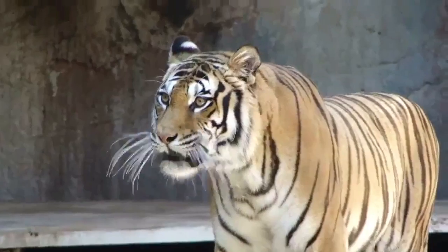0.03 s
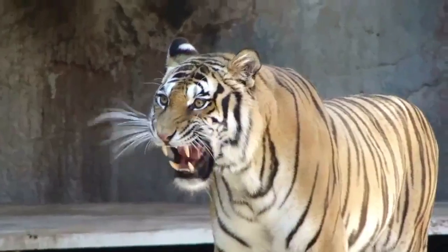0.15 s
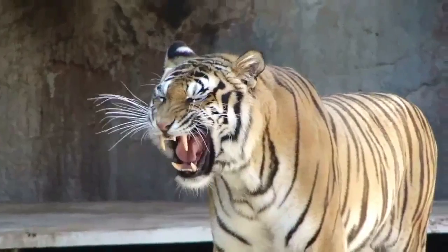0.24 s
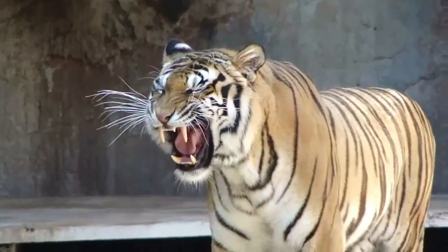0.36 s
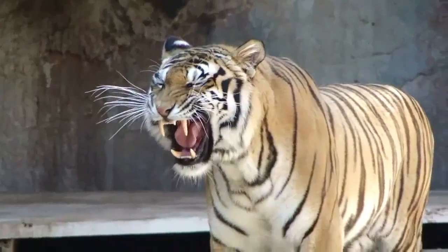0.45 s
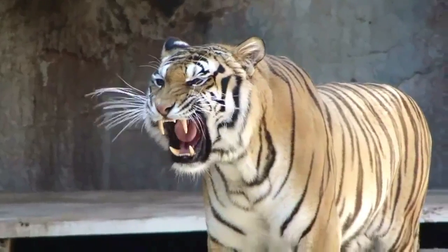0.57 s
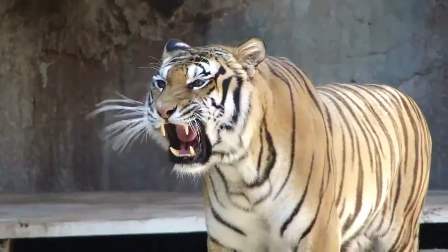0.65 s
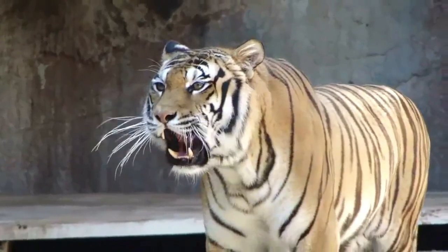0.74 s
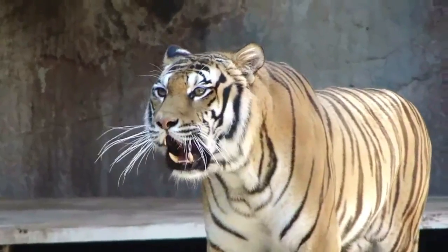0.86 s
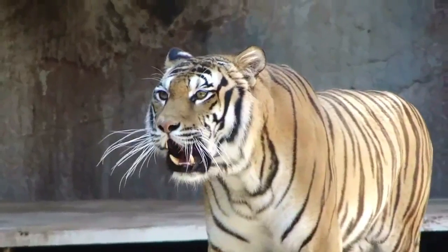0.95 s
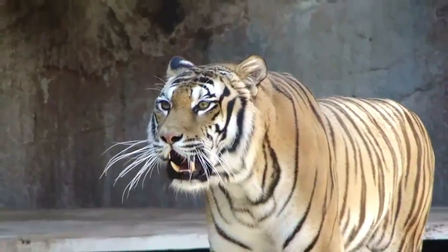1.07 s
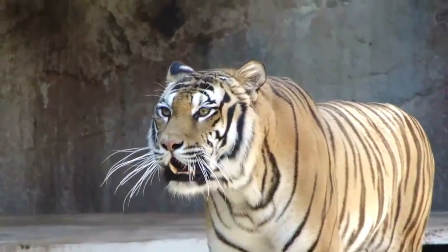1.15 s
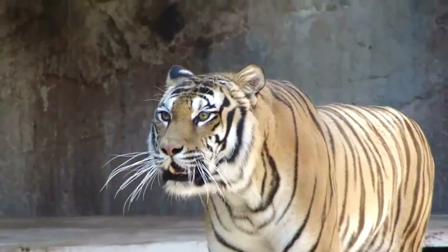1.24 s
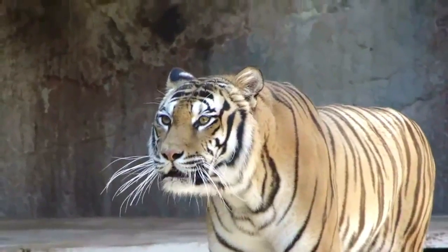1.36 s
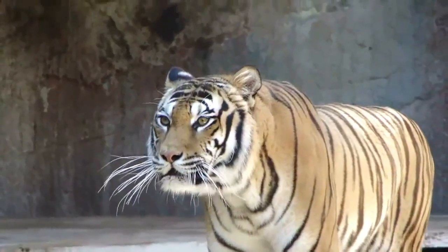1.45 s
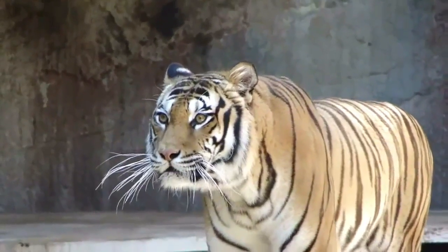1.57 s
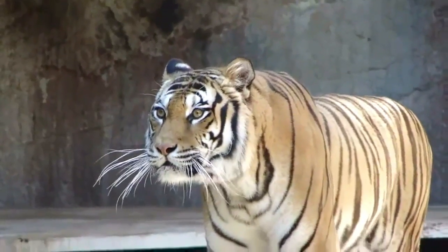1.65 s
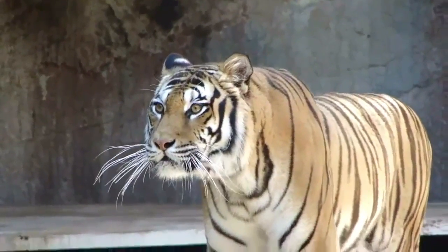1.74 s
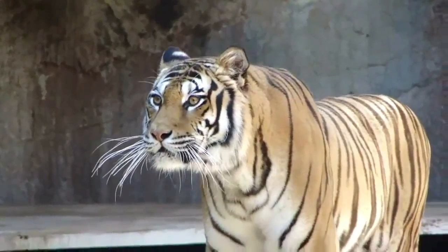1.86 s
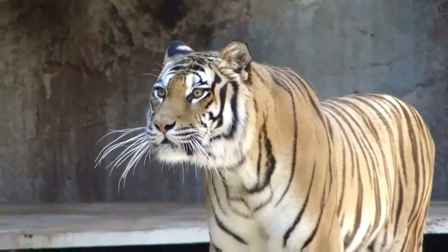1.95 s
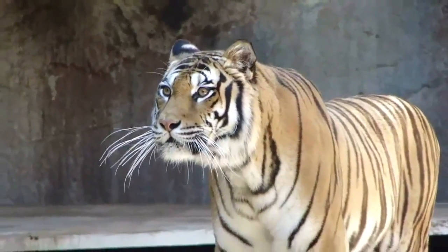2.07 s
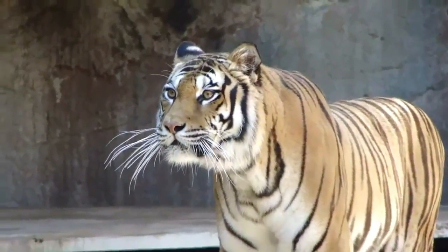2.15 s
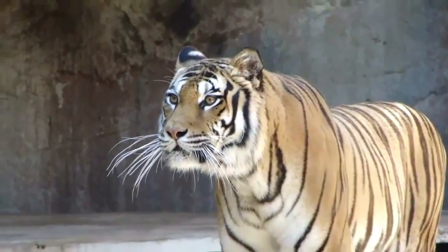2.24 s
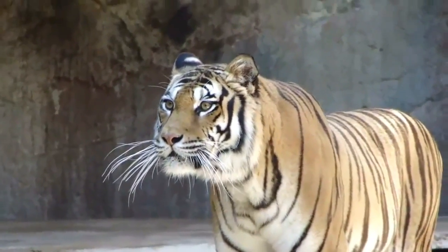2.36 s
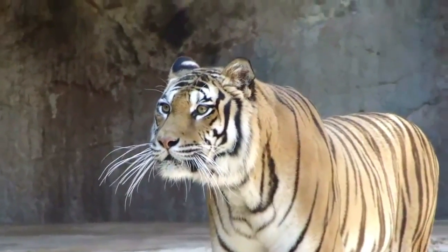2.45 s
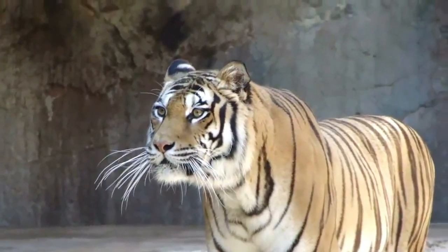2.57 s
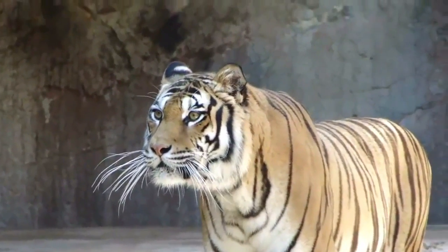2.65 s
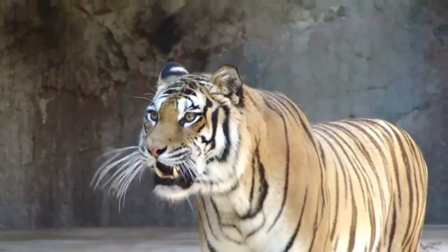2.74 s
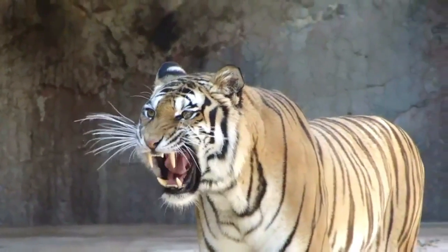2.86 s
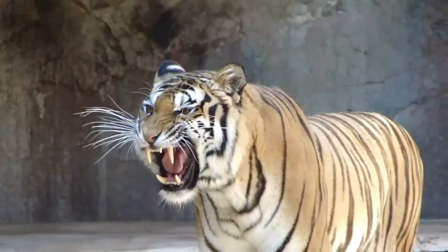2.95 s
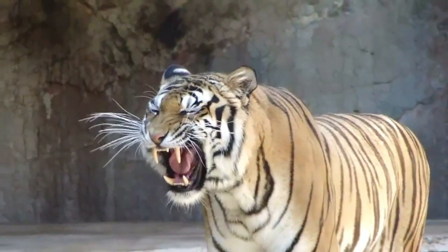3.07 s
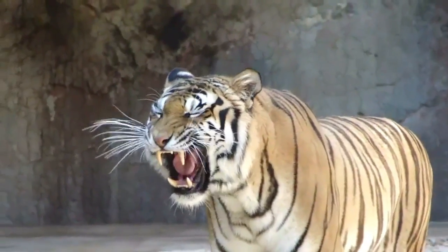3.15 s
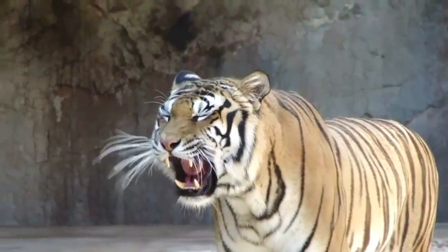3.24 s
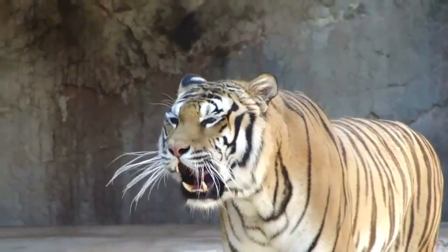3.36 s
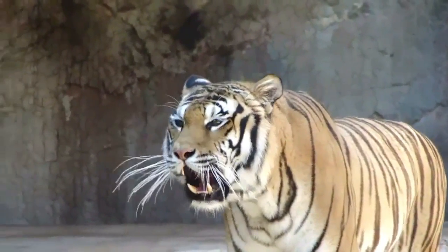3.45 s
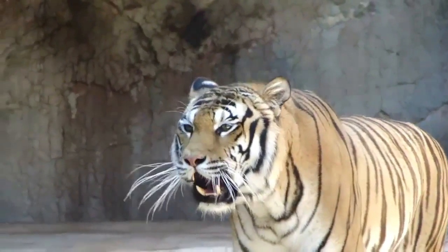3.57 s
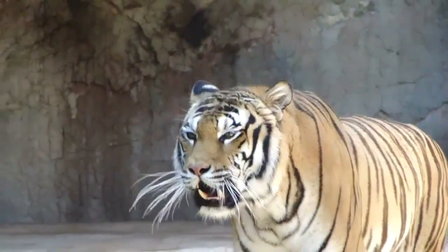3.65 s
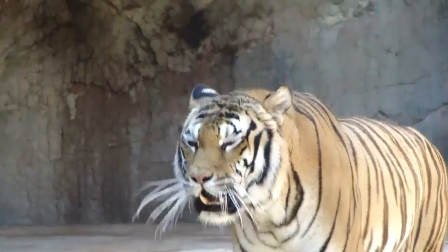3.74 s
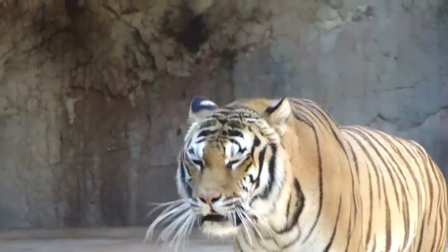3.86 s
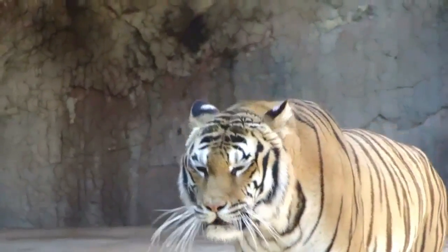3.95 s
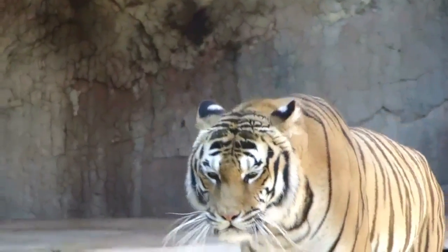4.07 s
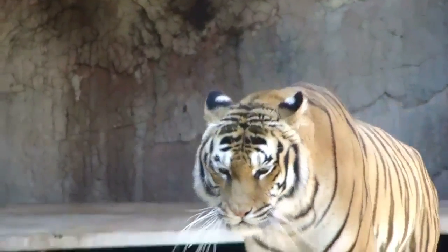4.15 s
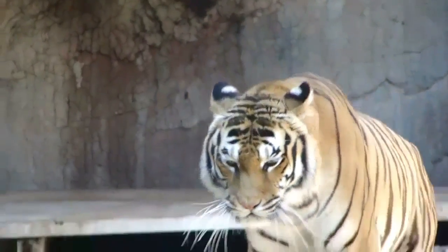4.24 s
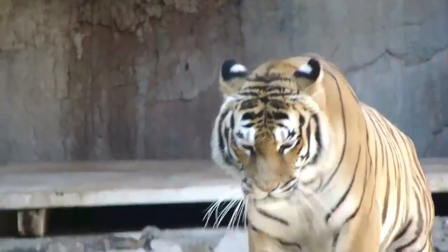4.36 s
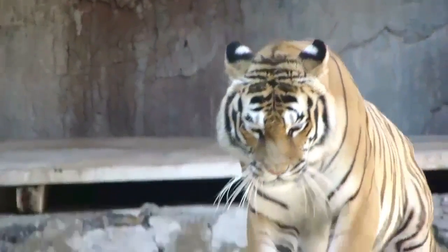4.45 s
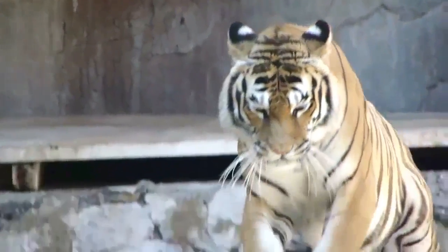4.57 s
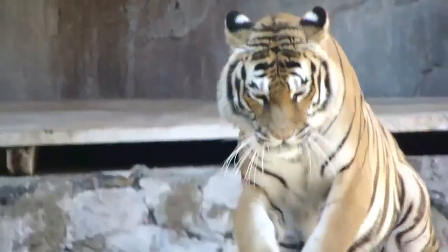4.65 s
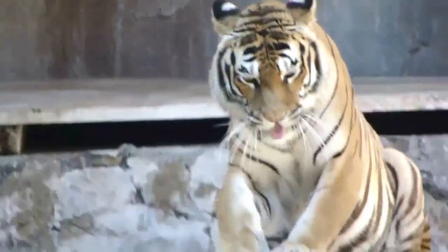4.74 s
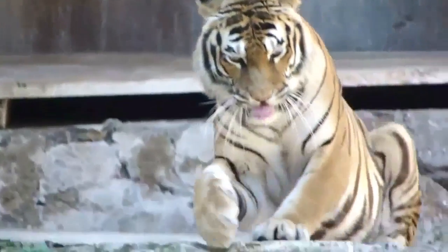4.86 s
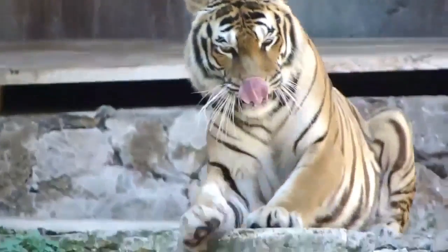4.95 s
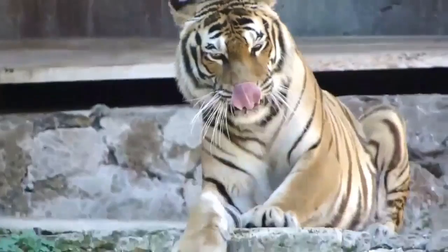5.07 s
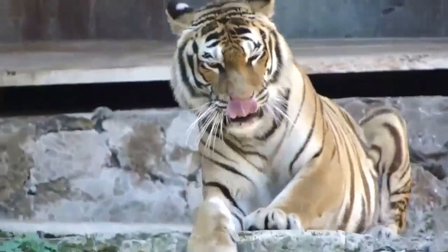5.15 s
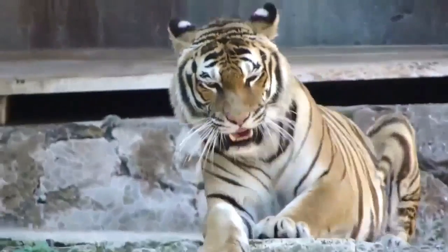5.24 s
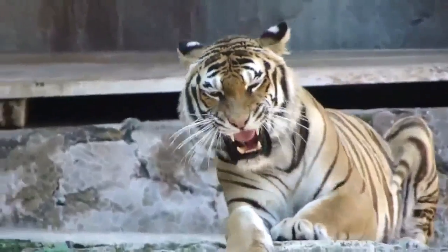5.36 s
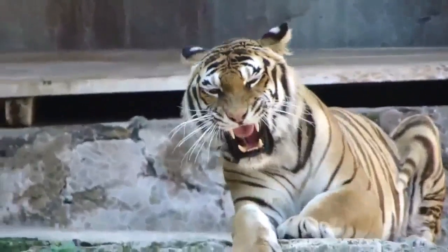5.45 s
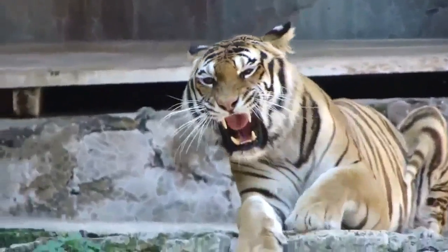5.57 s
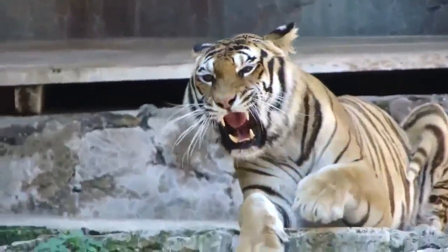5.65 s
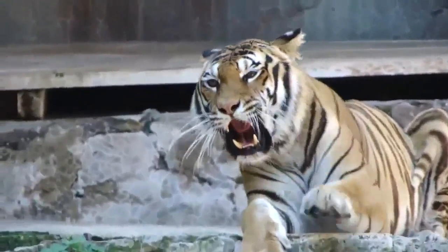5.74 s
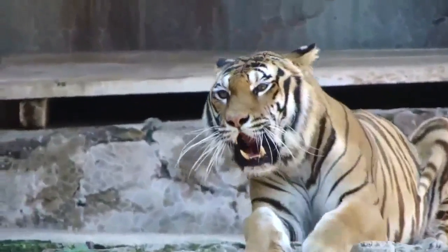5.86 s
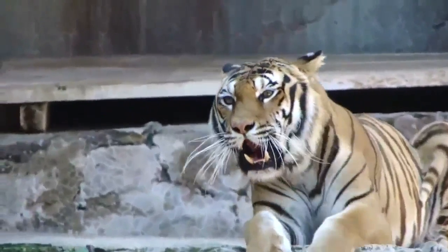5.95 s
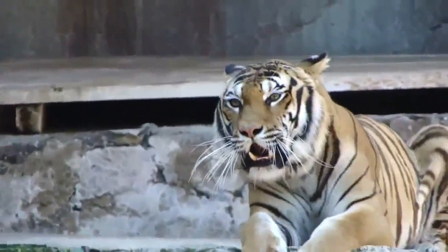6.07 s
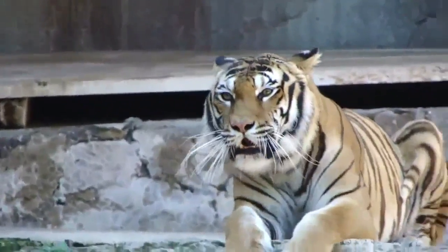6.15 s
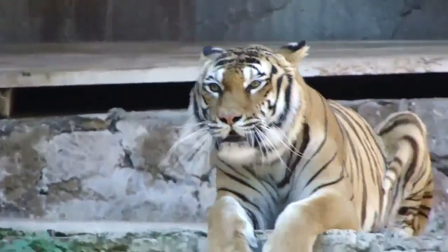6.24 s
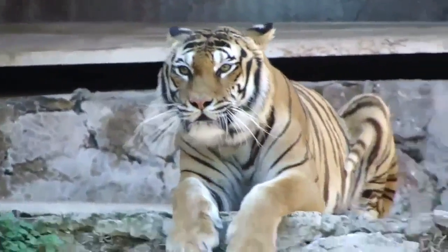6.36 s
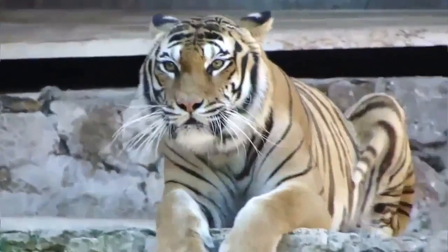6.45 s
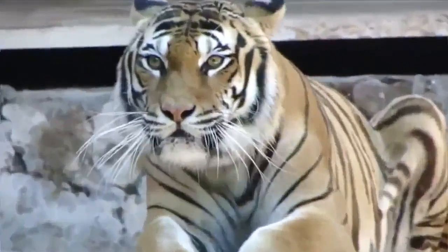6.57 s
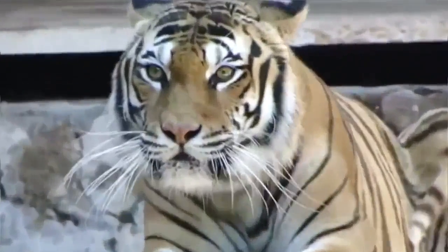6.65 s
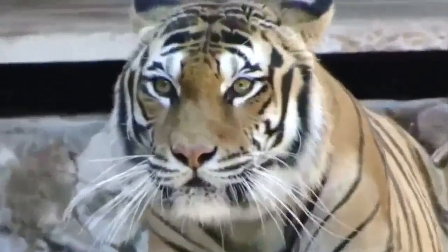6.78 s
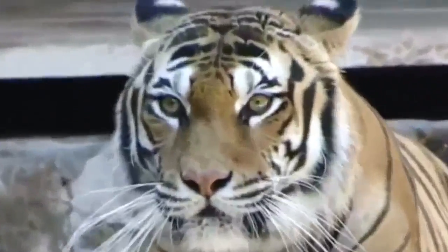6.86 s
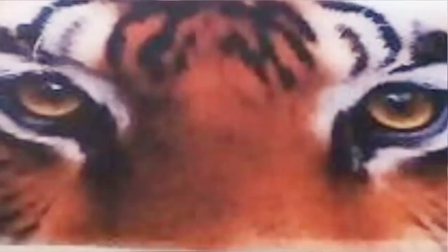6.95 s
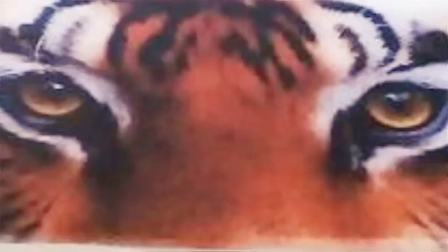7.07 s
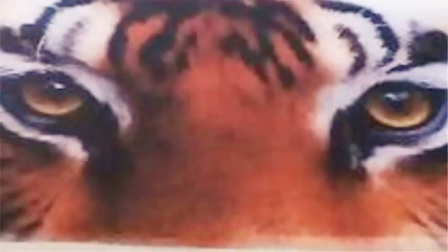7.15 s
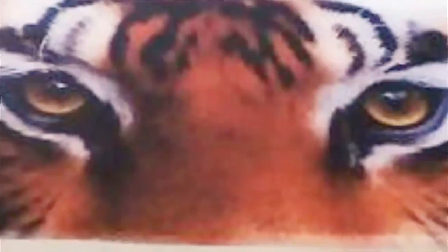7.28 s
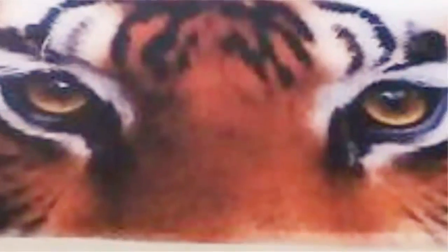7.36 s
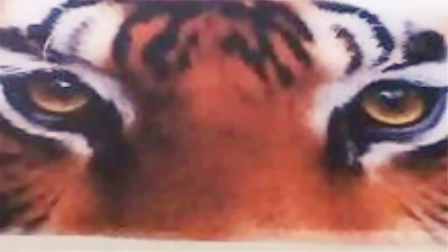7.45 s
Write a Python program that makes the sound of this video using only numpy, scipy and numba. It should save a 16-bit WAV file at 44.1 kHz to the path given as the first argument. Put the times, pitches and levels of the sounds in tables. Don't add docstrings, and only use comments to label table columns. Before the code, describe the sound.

A tiger very close to the microphone in a quiet enclosure. A short snort bursts into a loud, hoarse roar, sags into a low fluttering growl, and a second growl begins to rise. An identical call cuts in over it and runs further: the last growl swells to a snarl, rattles down and fades. After a tiny silent gap, another snort starts. Faint hiss and low murmur lie beneath.

```python
import sys
import numpy as np
from scipy import signal
from scipy.io import wavfile
from scipy.ndimage import uniform_filter1d
from numba import njit

SR = 44100
rng = np.random.default_rng(int(sys.argv[2]) if len(sys.argv) > 2 else 0)


def attenuation_scalar(level_db):
    decades = np.asarray(level_db, float) / 20
    return 10 ** decades


def materialize(psi):
    bounded = np.clip(np.atleast_2d(psi).T, -1, 1)
    quanta = np.round(bounded * 32767).astype(np.int16)
    wavfile.write(sys.argv[1], SR, quanta)


N = 331191

# time in seconds [s], flaps per second [1/s].
SNORT_FLAPS = [(2.763, 33.3), (2.843, 43.2), (2.906, 48.7), (2.974, 42.2), (3.047, 39.2), (3.098, 37.8)]
ROAR_FLAPS = [(3.161, 46.5), (3.242, 51.6), (3.407, 46.2), (3.707, 33.9), (3.88, 34.7), (4.068, 29.4),
              (4.177, 44.1), (4.445, 30.0)]
GROWL_FLAPS = [(4.485, 34.9), (4.708, 37.1), (4.828, 28.8), (5.018, 23.8)]
RISING_FLAPS = [(5.057, 25.0), (5.265, 32.6), (5.446, 33.9), (5.728, 36.9), (5.867, 35.0)]
DYING_FLAPS = [(5.895, 34.4), (6.042, 47.2), (6.178, 41.4), (6.447, 32.8), (6.776, 28.0), (6.912, 30.8),
               (7.118, 27.6), (7.371, 27.6)]
LAST_FLAPS = [(7.429, 39.7), (7.484, 33.5)]

# time in seconds [s], effort in dB [dB], strain in dB [dB], roughness from 0 to 1 [0-1].
SNORT = [(2.733, -34, 15, 1.1), (2.773, -17, -3, 0.7), (2.833, -18, 1, .7), (2.89, -20, 8.5, 0.6),
         (3.03, -8, -3.5, .6), (3.08, -11.5, -4.5, 0.7), (3.116, -25.5, 8, 0.25), (3.151, -24, 7, .05)]
ROAR = [(3.158, -20.5, 5.5, .05), (3.184, -9.5, 3, 0.54), (3.27, -10.5, 11, 0.74), (3.34, -11, 13, .9),
        (3.42, -8.5, 4.5, 0.92), (3.6, -10.5, -4, 0.33), (4.15, -18, 3.5, 0.61), (4.35, -22.5, 3.5, 0.6),
        (4.465, -27, 0.5, 0.28)]
GROWL = [(4.482, -21.5, -0.5, 0.97), (4.52, -19.5, 3.5, 0.57), (4.8, -20.5, -1, 0.37), (4.93, -18, -11, .3),
         (5.0, -26.5, 3.5, .3)]
RISING = [(5.13, -23.5, -4.5, 0.45), (5.23, -20.5, -2.5, 0.18), (5.43, -19.5, -1, 0.6),
          (5.63, -16, 2, 0.87), (5.8, -15, -0.5, 0.76), (5.87, -21, -5, 0.42)]
DYING = [(5.92, -15, -2, 0.85), (6.05, -12.5, -2, 0.74), (6.3, -16.5, -1.5, 0.46), (6.5, -17, -2, 0.7),
         (6.9, -27, 2, 0.57), (7.0, -26.5, -1.5, 0.3), (7.19, -28.5, 2, 0.1), (7.27, -27, -5, 0.25),
         (7.367, -38.5, 14.5, 0.51)]
LAST = [(7.421, -19.5, 7.5, .5), (7.451, -22, 2.4, 0.94), (7.51, -23, 3.3, 0.81)]

# time in seconds [s], extra level in dB [dB].
SLAMS = [(2.867, 6), (2.945, 2), (2.987, 1.5), (3.067, 5), (3.157, 5.5), (3.595, 2), (3.622, 1.5),
         (3.706, -1.5), (3.762, 0.5), (3.877, 0.5), (4.54, 1.5), (4.651, 4), (4.787, 1.5), (5.889, 5),
         (6.359, 4), (6.415, 7.5), (6.669, 4.5), (6.908, 2.5), (7.457, 7.5)]

# time in seconds [s], chest in Hz [Hz], throat in Hz [Hz], mouth in Hz [Hz], jaw open [0-1].
POSTURE = [(2.73, 135, 440, 900, 0), (2.85, 152, 510, 902, 0.77), (3.1, 117, 440, 792, 0.61),
           (3.2, 131, 440, 760, 0.84), (3.28, 137, 306, 730, 1), (3.4, 109.5, 362, 752, 0.95),
           (3.9, 107, 354, 706, 0.76), (4.2, 109, 330, 710, 0.58), (4.46, 109, 308, 834, 0.6),
           (4.49, 119.4, 257, 674, 0.59), (4.92, 109.6, 260, 662, 0.13), (5.2, 139, 287, 792, 0.38),
           (5.42, 163.6, 282, 808, 0.17), (5.8, 150.4, 518, 720, 0.32), (6.05, 171, 403, 857, 0.48),
           (6.35, 166, 300, 855, 0.3), (7.36, 169, 288, 897, 0.26), (7.42, 112, 288, 737, 0.07)]

# centre in Hz [Hz], width in Hz [Hz], level in dB [dB].
JAW_OPEN = [(1325, 130, -0.5), (2306, 320, 1.5), (2670, 170, 2), (3203, 153, 3), (3546, 79, 3.5),
            (4430, 850, -9), (5430, 480, -7), (5710, 620, -10), (6700, 610, -9.5), (9700, 7200, -21.5)]
JAW_SHUT = [(1532, 237, 4.5), (2440, 250, -7), (2585, 67, -0.5), (3500, 500, -14), (4700, 220, -14),
            (6660, 220, -8), (8200, 2000, -77)]
LIPS_BACK = [(1370, 240, -10), (2010, 310, -0.5), (2560, 190, -2.5), (2700, 270, -2), (4120, 680, 0),
             (4910, 250, -6), (5420, 240, -27.5), (9300, 9000, -26.5)]

# start in seconds [s], length in seconds [s], centre in Hz [Hz], width in Hz [Hz], level in dB [dB].
RATTLES = [
    (2.77, 0.019, 1290, 280, -33.5),
    (4.874, 0.0064, 1910, 250, -48),
    (4.882, 0.015, 1480, 253, -41.5),
    (4.93, 0.091, 1190, 300, -55.5),
    (4.881, .001, 5500, 3000, -46),
    (4.921, .001, 5500, 3000, -48),
    (4.937, .0015, 6000, 3000, -55),
    (5.831, 0.0038, 4100, 244, -33),
]

# pitch in Hz [Hz], level in dB [dB].
SQUEAK = [(9130, -71), (9959, -70)]

# offset in dB, dB per dB of strain, extra dB per dB of effort,
# dB per open jaw, dB lost through the nose.
THROAT_LAW = (-9, 1, 0.5731, -0.3, -2)
MOUTH_LAW = (-13, 0.5742, 0.08, 1, 6)
RASP_LAW = (-23.5, 1.01, 0.3377, 0, 11.5)

USUAL_EFFORT_DB = -20
NOSE_OPENS_S, NOSE_TAKES_S = 2.95, 0.033
SNARL_S, SNARL_HOLD_S, SNARL_RELAX_S, LIPS_AT_REST = 5.87, 0.13, 1, 0.041
SQUEAK_START_S, SQUEAK_END_S = 4.43, 4.475
HISS_DB, MURMUR_DB = -67, -58.5
REPEAT = 120540
FIRST_ENDS = round(2.918 * SR)
SILENT_FROM, SILENT_TO = round(7.371 * SR), round(7.417 * SR)


def call():
    chest_db, strain_db, rough = in_time(SNORT + ROAR + GROWL + RISING + DYING + LAST)
    chest_hz, throat_hz, mouth_hz, jaw = in_time(POSTURE)
    rough, lips = np.clip([rough, snarl()], 0, 1)
    effort_db = chest_db - USUAL_EFFORT_DB
    nasal = np.clip((NOSE_OPENS_S - np.arange(N) / SR) / NOSE_TAKES_S + 0.5, 0, 1)

    def answer_db(law):
        offset, per_strain, per_effort, per_jaw, nose_loss = law
        return (chest_db + offset + per_strain * strain_db + per_effort * effort_db
                + per_jaw * jaw - nose_loss * nasal)

    flaps, slips = folds(rough, lead_share(jaw), uneven_db=2.3, early_s=0.0105, slips_per_s=500, slip_db=-7)
    air = breath(flaps + slips, puff_s=0.0017, leak=0.75 + 0.84 * rough ** 2)
    drive = flaps + slips + 0.02 * rough * air

    chest = chest_ring(flaps, slips, air, rough, lips, chest_hz, effort_db)
    throat = throat_ring(drive, throat_hz, chest_hz, effort_db, strain_db, jaw)
    mouth = mouth_ring(drive, air, mouth_hz, rough, jaw)
    rasp = rasp_ring(flaps + slips, air, chest_hz, rough, jaw, lips)
    voice = attenuation_scalar(chest_db) * evened(chest)
    voice += attenuation_scalar(answer_db(THROAT_LAW)) * evened(throat)
    voice += attenuation_scalar(answer_db(MOUTH_LAW) + 2.1 * flutter(14)) * evened(mouth)
    voice += attenuation_scalar(answer_db(RASP_LAW)) * evened(rasp)
    return attenuation_scalar(slam_swell()) * voice


def folds(rough, early_share, uneven_db, early_s, slips_per_s, slip_db):
    closures = np.zeros(N)
    for table in (SNORT_FLAPS, ROAR_FLAPS, GROWL_FLAPS, RISING_FLAPS, DYING_FLAPS, LAST_FLAPS):
        start, end = round(table[0][0] * SR), round(table[-1][0] * SR) + 200
        turns = np.cumsum(in_time(table)[0][start:end]) / SR
        whole_turns = np.flatnonzero(np.diff(np.floor(turns), prepend=-1))
        closures[start + whole_turns - 65] = 1
    at = np.flatnonzero(closures)
    chance = rng.standard_normal((len(at), 3))
    strength_db = uneven_db * chance[:, 0] * (0.6 + rough[at])
    for s, extra_db in SLAMS:
        nearest = np.argmin(np.abs(at - s * SR))
        at[nearest], strength_db[nearest] = round(s * SR), extra_db
    flaps = np.zeros(N)
    flaps[at] = attenuation_scalar(strength_db)
    lead = (early_s * SR * attenuation_scalar(0.6 * chance[:, 1])).astype(int)
    flaps[at - lead] += early_share[at] * attenuation_scalar(3.6 * chance[:, 2])
    slipped = rng.random(N) < slips_per_s * rough ** 2 / SR
    signs = rng.choice([-1, 1], N, p=[0.3, 0.7])
    slip_strength = attenuation_scalar(slip_db + 3.1 * rng.exponential(1, N).clip(0, 3))
    return flaps, rough * slipped * signs * slip_strength


def lead_share(jaw):
    rate, = in_time(GROWL_FLAPS + RISING_FLAPS)
    slow = np.clip(27.5 - rate, 0, 2)
    return np.clip(0.13 + 0.35 * jaw + 0.2 * slow, 0, 1)


def slam_swell():
    s = np.arange(N) / SR
    return 0.6 * sum(np.clip(db, 0, 9) * np.exp(-((s - at - 0.004) / 0.008) ** 2) for at, db in SLAMS)


def breath(beats, puff_s, leak):
    r = np.exp(-1 / (puff_s * SR))
    rising = signal.lfilter([1], [1, -r], np.abs(beats))
    puffs = signal.lfilter([1 - r], [1, -r], rising)
    return (evened(np.roll(puffs, -round(puff_s * SR))) + leak) * rng.standard_normal(N)


def chest_ring(flaps, slips, air, rough, lips, chest_hz, effort_db):
    soft = passed(flaps + (0.5 + 0.5 * rough) * slips + 0.02 * rough * air, 247, "low")
    push = passed(soft, [26, 135], "band", order=1)
    push_db = -5 - 0.4 * effort_db - 0.034 * (chest_hz - 139)
    wandering_hz = chest_hz * (1 + 0.074 * rough * flutter(9.8))
    return cavity(soft, wandering_hz, 17.5 + 40 * rough * lips) + push * attenuation_scalar(push_db)


def throat_ring(drive, throat_hz, chest_hz, effort_db, strain_db, jaw):
    width_hz = 220 * attenuation_scalar(-np.clip(strain_db + 4, 0, None) * jaw)
    cheek_db = -1.5 - 0.9 * effort_db + 0.18 * (chest_hz - 130)
    windpipe_db = -1.5 - 0.12 * (chest_hz - 135)
    throat = cavity(drive, throat_hz, width_hz)
    throat += attenuation_scalar(cheek_db + 4 * flutter(25)) * cavity(drive, 610 - 100 * jaw, 130)
    throat += attenuation_scalar(windpipe_db + 3 * flutter(25)) * cavity(drive, 236, 45)
    return late(passed(cavity(throat, 272, 1015), 668, "low"), 0.001512)


def mouth_ring(drive, air, mouth_hz, rough, jaw):
    mouth_hz = mouth_hz * (1 + 0.05 * jaw * flutter(9))
    narrow = cavity(drive + 0.03 * rough * air, mouth_hz, 40 + 60 * rough)
    mouth = (1 - 0.5 * jaw) * cavity(narrow, mouth_hz, 340)
    mouth += attenuation_scalar(-15 + 5 * flutter(30)) * passed(drive, [560, 1000], "band")
    mouth = passed(mouth, 1060, "low", order=3)
    open_ring = cavity(cavity(drive, 1100, 200), 1100, 500)
    return mouth + jaw * attenuation_scalar(-9 + 4 * flutter(30)) * open_ring


def rasp_ring(beats, air, chest_hz, rough, jaw, lips):
    bright = air + 10 * beats
    wide, shut, bared = (upper(bright, modes, patchy_db=4, turns=45)
                         for modes in (JAW_OPEN, JAW_SHUT, LIPS_BACK))
    tongue_hz = 3390 + 3.9 * chest_hz
    shut -= attenuation_scalar(8.5 + 8.1 * flutter(45)) * cavity(bright, tongue_hz, 225)
    wide += rough ** 2 * attenuation_scalar(2.5) * cavity(bright, 870, 640)
    relaxed = jaw * wide + (1 - jaw) * shut
    return passed((1 - lips) * relaxed + lips * bared, 970, "high", order=3)


def upper(bright, modes, patchy_db, turns):
    total = np.zeros(N)
    for k, (hz, width_hz, db) in enumerate(modes):
        strength = attenuation_scalar(db + patchy_db * min(1, 3000 / hz) * flutter(turns))
        total += (-1) ** k * strength * cavity(bright, hz, width_hz)
    return total


def snarl():
    age = np.arange(N) / SR - SNARL_S
    held = np.exp(-np.clip(age - SNARL_HOLD_S, 0, None) / SNARL_RELAX_S)
    creep, snap = np.clip(1 + age / 0.5, 0, 1), np.clip(age / 0.08, 0, 1)
    return LIPS_AT_REST + held * (0.32 * creep + 0.53 * snap)


def rattles():
    s, out = np.arange(N) / SR, np.zeros(N)
    clicks = rng.standard_normal(N) ** 3
    for start, length, hz, width_hz, db in RATTLES:
        age = np.clip((s - start) / length, 0, 30)
        out += attenuation_scalar(db) * age * np.exp(1 - age ** 0.85) * evened(cavity(clicks, hz, width_hz))
    return out


def squeak():
    s = np.arange(N) / SR
    fade = np.clip(np.minimum(s - SQUEAK_START_S, SQUEAK_END_S - s) / 0.0027, 0, 1)
    return fade * sum(attenuation_scalar(db) * np.sqrt(2) * np.sin(2 * np.pi * hz * s) for hz, db in SQUEAK)


def background():
    hiss = passed(rng.standard_normal(N), 4200, "high")
    murmur = evened(passed(rng.standard_normal(N), [180, 700], "band", order=1))
    return attenuation_scalar(HISS_DB) * hiss + attenuation_scalar(MURMUR_DB) * murmur


def in_time(rows):
    s, *columns = np.transpose(rows)
    return [np.interp(np.arange(N) / SR, s, c) for c in columns]


def flutter(rate):
    knots = rng.standard_normal(int(N / SR * 80))
    return np.interp(np.arange(N) / SR * rate, np.arange(len(knots)), knots)


def passed(x, hz, kind, order=2):
    return signal.sosfilt(signal.butter(order, hz, kind, fs=SR, output="sos"), x)


def evened(x):
    power = uniform_filter1d(uniform_filter1d(x ** 2, size=2000), size=2000)
    return x / np.sqrt(np.maximum(power, 0) + 1e-12)


def late(x, lag_s):
    return np.interp(np.arange(N) - lag_s * SR, np.arange(N), x)


@njit
def resonate(x, r, cosine):
    y = np.zeros(len(x))
    for i in range(2, len(x)):
        fed = (1 - r[i] ** 2) / 2 * (x[i] - x[i - 2])
        y[i] = fed + 2 * r[i] * cosine[i] * y[i - 1] - r[i] ** 2 * y[i - 2]
    return y


def cavity(x, hz, width_hz):
    r = np.exp(-np.pi * width_hz / SR) + 0 * x
    return resonate(x, r, np.cos(2 * np.pi * hz / SR) + 0 * x)


def scene():
    voice = call() + rattles() + squeak() + background()
    voice[:REPEAT] = 0
    voice[SILENT_FROM:SILENT_TO] = 0
    voice[:FIRST_ENDS] += voice[REPEAT:REPEAT + FIRST_ENDS].copy()
    return voice[None]


def top_cut(x):
    return signal.sosfilt(signal.butter(12, 14760, fs=SR, output="sos"), x)


def record(dry):
    pole = np.exp(-2 * np.pi * 38 / SR)
    turned = signal.lfilter([pole, -1], [1, -pole], dry)
    below = passed(np.tanh(turned / 1.373) * 0.94, 10330, "low", order=8)
    mirror = passed(below * (-1) ** np.arange(N), 11400, "high", order=8)
    top_filter = signal.cheby2(12, 50, 14140 + 350, fs=SR, output="sos")
    band = signal.sosfilt(top_filter, below + mirror)
    return top_cut(band + 0.0033)


dry = scene()
out = record(dry)
materialize(out)
```